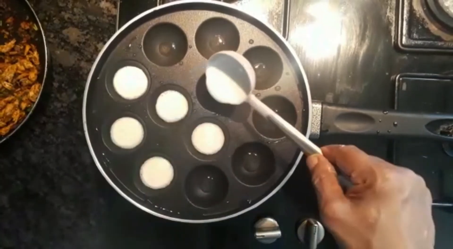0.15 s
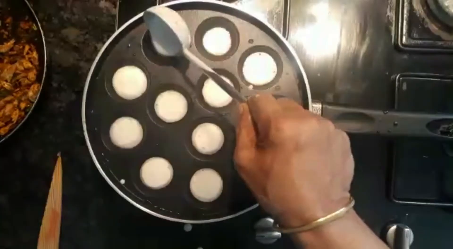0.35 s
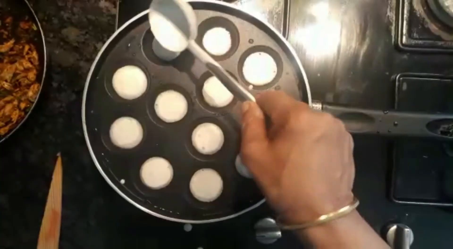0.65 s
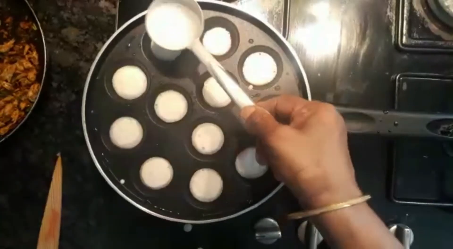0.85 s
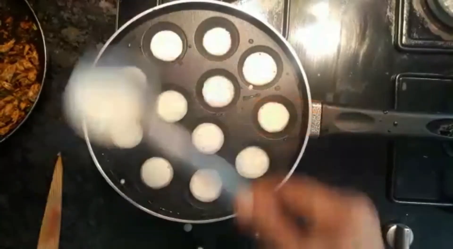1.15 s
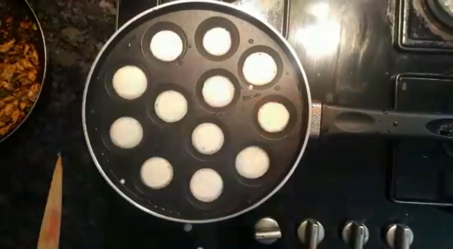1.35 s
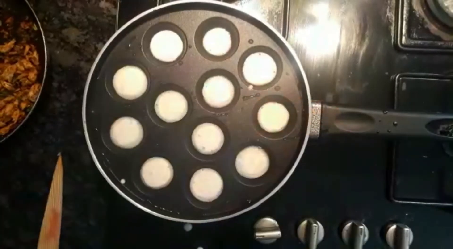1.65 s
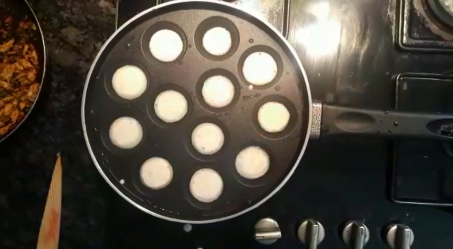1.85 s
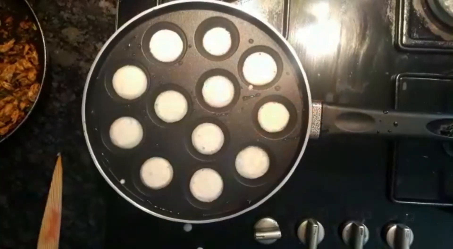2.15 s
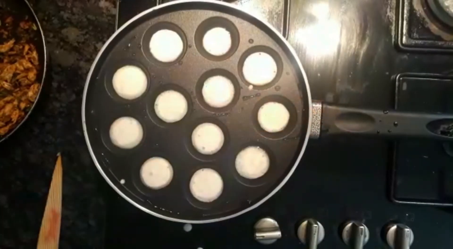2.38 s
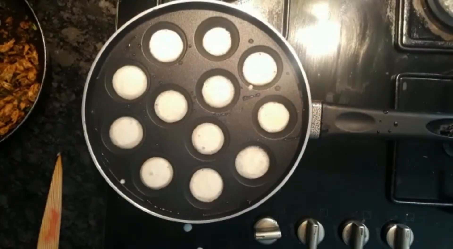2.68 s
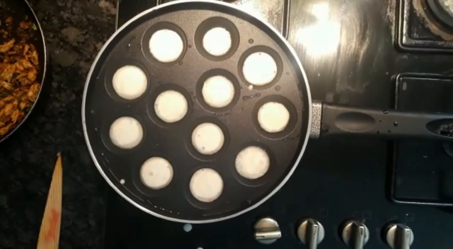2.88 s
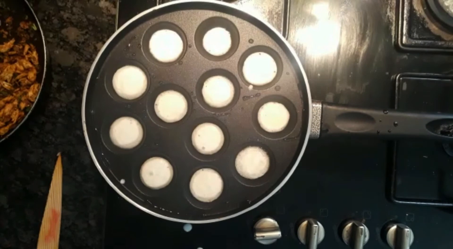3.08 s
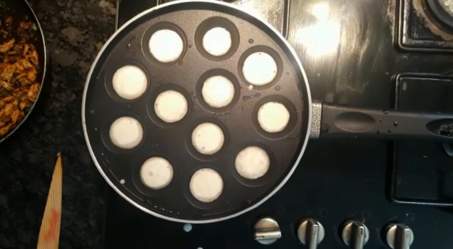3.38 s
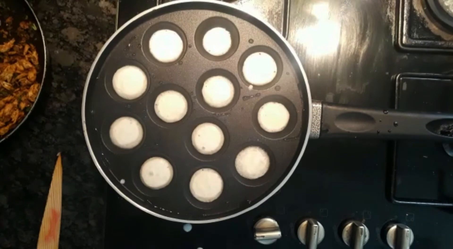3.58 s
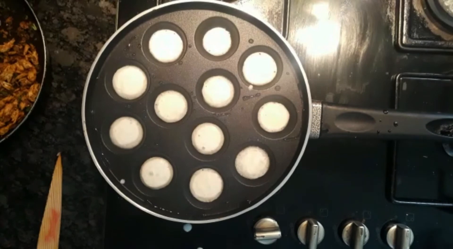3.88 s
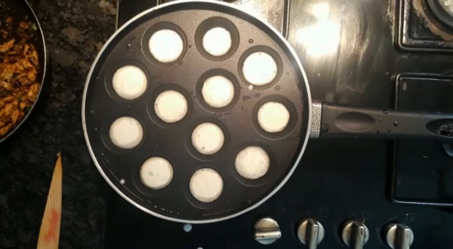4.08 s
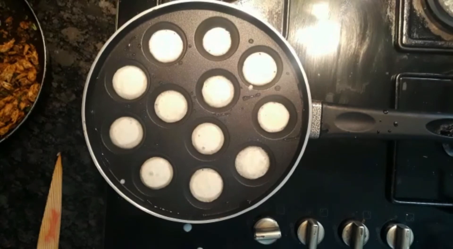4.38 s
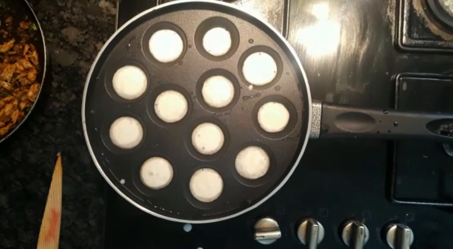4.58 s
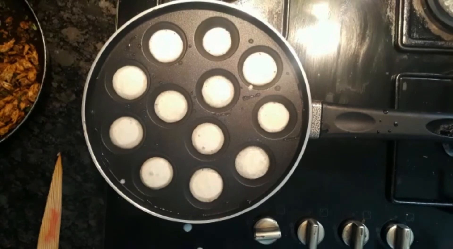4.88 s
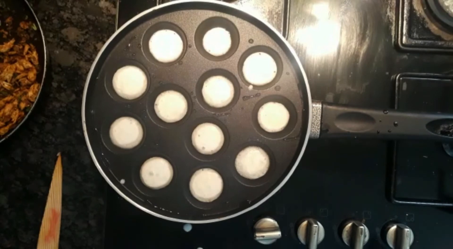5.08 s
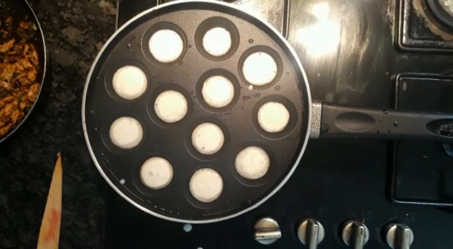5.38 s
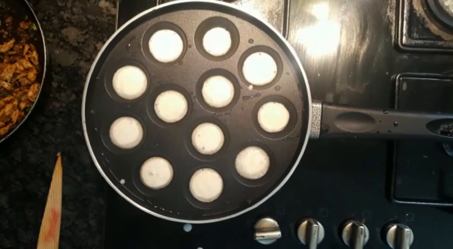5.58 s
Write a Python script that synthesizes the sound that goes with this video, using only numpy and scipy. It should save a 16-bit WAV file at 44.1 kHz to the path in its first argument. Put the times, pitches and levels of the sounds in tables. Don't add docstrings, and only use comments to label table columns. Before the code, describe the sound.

Dense crackling fry with sharp wet pops and spitting oil, broken by a metallic clink, a hard cupboard knock and a softer second one.

```python
import sys
import numpy as np
from scipy import signal
from scipy.fft import rfft, irfft
from scipy.io import wavfile
from scipy.ndimage import uniform_filter1d

SR = 44100
rng = np.random.default_rng(int(sys.argv[2]) if len(sys.argv) > 2 else 0)


def amp(db):
    return 10 ** (np.asarray(db, float) / 20)


def write(x):
    x = np.atleast_2d(x).T
    wavfile.write(sys.argv[1], SR, np.round(np.clip(x, -1, 1) * 32767).astype(np.int16))


N = 253134

# freq_hz [Hz], level_db [dB]
HOLLOW_SPECTRUM = [(1900, -30), (2300, -5), (2800, 2), (3250, 1.5), (3700, -7), (4200, -11.5),
                   (4800, -22.5)]
# freq_hz [Hz], level_db [dB]
DEEP_SPECTRUM = [(400, -10), (700, -7), (900, 6), (1200, 3), (1600, 3.5), (2000, 7.5), (2500, -26)]
# freq_hz [Hz], level_db [dB]
SPRAY_SPECTRUM = [(3800, -15), (4600, -3), (5200, 0), (7000, -0.5), (9000, 0.5), (11000, 2), (13000, -1),
                  (15600, -3)]
# freq_hz [Hz], level_db [dB]
WOOD_SPECTRUM = [(41, -83), (70, -27), (137, -3), (177, -5.5), (395, -8.5), (423, -16), (596, -1),
                 (784, -5.5), (1070, -3.5), (1670, -6), (2390, -19), (3360, -19), (4200, -30), (5460, -90),
                 (9240, -120)]
# freq_hz [Hz], level_db [dB]
HUM_SPECTRUM = [(15, -28), (25, -7), (35, -4), (49, -43), (77, -5.5), (119, 3), (143, -2), (195, -7),
                (244, -7), (437, -12.5), (706, -6.5), (810, -10.5), (897, -6), (1180, -20.5), (1500, -7.5),
                (1950, -40), (3300, -120)]


def on_log(hz, table):
    f, v = np.transpose(table)
    return np.interp(np.log(np.maximum(hz, 1)), np.log(f), v)


def along(table):
    s, *columns = np.transpose(table)
    return [np.interp(np.arange(N) / SR, s, c) for c in columns]


def through(x, response):
    return signal.fftconvolve(x, response)[:N]


def colour(table, size=4096):
    log_gain = on_log(np.arange(size // 2 + 1) * SR / size, table) * np.log(10) / 20
    cepstrum = irfft(log_gain)
    cepstrum[1:size // 2] *= 2
    cepstrum[size // 2 + 1:] = 0
    response = irfft(np.exp(rfft(cepstrum)))
    return response / np.sqrt(np.sum(response ** 2))


def strikes(s, size):
    return np.bincount(np.clip(np.asarray(s) * SR, 0, N - 1).astype(int), size, N)


def burst(push, fade_ms, rise_ms):
    t_ms = np.arange(SR // 20) * 1000 / SR
    power = np.exp(-2 * t_ms / fade_ms) * (1 - np.exp(-t_ms / rise_ms)) ** 2
    return np.sqrt(np.abs(through(push ** 2, power))) * rng.standard_normal(N)


def walk(rate_hz):
    k = int(SR / rate_hz)
    held = np.repeat(rng.standard_normal(N // k + 1), k)
    return 1.45 * uniform_filter1d(uniform_filter1d(held, k), k)[:N]


def lone_bursts(count=200):
    # start_s [s], ring_db [dB], deep_db [dB re ring], spray_db [dB re ring]
    pops = [(0.0408, -26.5, -16, 2), (0.2623, -23.5, -11.5, 1), (0.4099, -31, -6, 8.5), (0.442, -34, -5, 5),
            (0.464, -31, -6.5, 5), (0.619, -28, -6, -8), (0.989, -27, -17, 2.5), (1.059, -28, -2, 3),
            (1.3796, -30, -13, -4), (1.4458, -30, -16, 2), (1.728, -27, -7.5, -16),
            (1.8799, -21.5, -12, -3), (2.258, -31, -2.5, -21), (2.5797, -27.5, -6, -16),
            (2.7356, -30, -8, -10), (2.9608, -25, -11.5, 4), (3.4356, -29.5, -12, 1.5),
            (3.775, -30.5, -12, 5), (3.8375, -33.5, -5.5, -1), (4.139, -31, 1, 1), (4.174, -29, -2, -3.5),
            (4.3204, -32.5, -4, -19), (4.4622, -31.5, -10, -4), (4.521, -29, -13.5, -2),
            (4.6705, -26.5, -11, -1.5), (4.8679, -27.5, -37, 2.5), (4.9376, -25.5, -13.5, -5),
            (5.0796, -28, -14, -3.5), (5.1474, -23, -6, -3), (5.5969, -30.5, -20, 0)]
    # start_s [s], ring_db [dB]
    plops = [(0.0575, -35), (0.0831, -34.5), (0.2122, -31), (0.399, -33), (0.5827, -35), (0.6085, -32),
             (0.6115, -36), (0.6505, -32.5), (0.7943, -34), (0.9139, -34), (1.1328, -36), (1.5319, -37),
             (1.7163, -34), (1.7427, -30.5), (1.9485, -30), (2.1337, -30), (2.1439, -40), (2.2683, -32),
             (2.3193, -30), (2.4308, -35), (2.6899, -34.5), (2.831, -29), (2.848, -33), (3.4236, -31.5),
             (4.5403, -34), (4.6905, -31.5), (4.8804, -30.5), (4.9069, -35), (4.9993, -33.5), (5.0547, -34)]
    # start_s [s], ring_db [dB]
    cracks = [(0.2258, -34), (0.2782, -33), (0.291, -32), (0.3207, -33), (0.3784, -35.5), (0.5631, -33),
              (0.7384, -34.5), (0.8625, -33), (0.9689, -32.5), (1.006, -33), (1.1171, -32.5),
              (1.3405, -31.5), (1.8168, -36), (1.8903, -33), (1.9374, -35), (2.2467, -33), (2.647, -40),
              (2.7622, -37), (2.818, -36), (2.99, -37.5), (3.0849, -34.5), (3.6221, -38), (4.62, -34),
              (4.7251, -36), (4.9896, -35), (5.222, -38), (5.4502, -35.5), (5.5421, -36), (5.628, -36),
              (5.678, -33.5),
              (0.093, -39), (0.186, -36), (0.3582, -34.5), (0.3695, -40), (0.5297, -37.5),
                    (0.5484, -40), (0.702, -40), (0.8361, -53), (0.8935, -35), (1.097, -34), (1.196, -38),
                    (1.2945, -38), (1.7963, -39), (2.0563, -37), (2.0892, -42), (2.1064, -44),
                    (2.4603, -51), (2.4828, -45), (2.5174, -34.5), (2.6571, -34.5), (3.109, -40),
                    (3.174, -36.5), (3.2006, -40), (3.2876, -35.5), (3.7401, -42), (3.8042, -37),
                    (3.9572, -39), (5.4206, -47), (5.4744, -35.5), (5.502, -40)]
    # start_s [s], spray_db [dB]
    spits = [(0.0123, -32.5), (0.13, -30.5), (0.3078, -31), (0.4485, -24), (0.4917, -31), (0.7312, -27),
             (0.9584, -37), (1.2217, -32), (1.374, -29), (1.75, -28.5), (1.8325, -37), (2.527, -35),
             (2.5576, -30.5), (2.742, -33), (2.8916, -26), (2.9203, -27), (3.1427, -31.5), (3.223, -32),
             (3.228, -29.5), (3.699, -29), (3.7138, -28), (3.817, -34), (4.058, -34), (4.416, -31),
             (4.8748, -32), (5.1327, -29.5), (5.2699, -28), (5.4417, -33.5), (5.6002, -27.5), (5.661, -33)]
    ring_re_spray_db, deep_re_spray_db = -7, -15.5
    rows = pops + [(s, db, -10.5, -6) for s, db in plops]
    rows = rows + [(s, db, -8.5, 3.7) for s, db in cracks]
    rows = rows + [(s, db + ring_re_spray_db, deep_re_spray_db - ring_re_spray_db, -ring_re_spray_db)
                   for s, db in spits]
    when = rng.random(count) * N / SR
    scatter_db = 3.5 * rng.standard_normal((count, 3))
    ticks = np.column_stack([when, scatter_db + [-42, -12, -.6]])
    s, ring_db, deep_db, spray_db = np.vstack([rows, ticks]).T
    ring = strikes(s, -amp(ring_db - 0.7))
    deep = strikes(s, -amp(ring_db + deep_db + 2.5))
    spray = strikes(s, amp(ring_db + spray_db - 2.5))
    return ring, deep, spray


def bubbles(ring, deep, spray):
    full = rng.random(N) < .5
    hollow = 0
    for share, pitch in ((full, 1.06), (~full, .92)):
        push = 4.5 * ring * share + .4 * burst(ring * share, 1.8, .2)
        hollow = hollow + through(push, colour(np.array(HOLLOW_SPECTRUM) * [pitch, 1]))
    low = through(3.23 * deep + .5 * burst(deep, 2.5, 0.18), colour(DEEP_SPECTRUM))
    spray = np.roll(spray, 16)
    droplets = 2 * np.roll(spray, 30) + burst(spray, 1.8, .25) + .2 * burst(spray, 8, .25)
    return hollow + low + through(droplets, colour(SPRAY_SPECTRUM))


def sizzle(count=3800):
    # time_s [s], level_db [dB]
    boiling = [(0.0, -52.5), (0.27, -51), (0.43, -47.5), (0.7, -47.5), (1.65, -47), (1.77, -46.5),
               (2.38, -46.5), (2.84, -48), (2.97, -50.5), (3.56, -49.5), (3.69, -53.5), (3.88, -47),
               (4.28, -49), (5.1, -49.5), (5.28, -50), (5.74, -50.5)]
    lone = bubbles(*lone_bursts())
    t = np.arange(N) / SR
    spray_db = along(boiling)[0]
    ring_db = spray_db + 2.5 - 0.3 * t
    deep_db = spray_db - 5.5 + 0.37 * t
    cluster = amp(0.4 * walk(14) + 2.1 * walk(70))
    u = rng.random((count, 5)).T
    size = amp(np.minimum(-3.0 * np.log(u[1]), 7.0))
    small = [strikes(u[0] * N / SR, size * amp(6.4 * (u[k] - 1.0))) * cluster for k in (2, 3, 4)]
    bed = bubbles(small[0] * amp(ring_db - 3.5), small[1] * amp(deep_db - 19.0),
                  small[2] * amp(spray_db - 2.5))
    fry = lone + bed
    for spectrum, hiss_db in ((HOLLOW_SPECTRUM, ring_db - 12), (DEEP_SPECTRUM, deep_db - 5.5),
                              (SPRAY_SPECTRUM, spray_db - 5.5)):
        fry = fry + through(rng.standard_normal(N), colour(spectrum)) * cluster * amp(hiss_db)
    lag = SR / 1744
    return fry + 0.2 * np.interp(np.arange(N) - lag, np.arange(N), fry, left=0)


def knocks():
    # start_s [s], level_db [dB], panel_hz [Hz], room_send_db [dB]
    blows = [
        (3.972, -35.5, 1240, -2.5),
        (3.9944, -5.5, 1190, -16.5),
        (4.382, -15.5, 1110, -16),
        (5.709, -42.5, 141, 3),
        (5.7267, -36, 1280, -7),
    ]
    near, far, t = 0, 0, np.arange(SR // 20) / SR
    box = amp(-14) * np.sin(2 * np.pi * 662 * t) * t / .006 * np.exp(1 - t / .006)
    for s, db, panel_hz, send_db in blows:
        turns = t * panel_hz
        swing = -np.sin(2 * np.pi * turns) * np.exp(-((turns - 2.1) / 1.1) ** 2)
        push = strikes([s], [amp(db)])
        body = through(push, colour(WOOD_SPECTRUM))
        near = near + through(push, swing + box) + amp(4) * np.roll(body, 60)
        far = far + body * amp(send_db + 32.5)
    return near, far


def clinks():
    # start_s [s], level_db [dB], bowl_hz [Hz], bowl_db [dB re the rest], room_send_db [dB]
    blows = [
        (1.5631, -14, 1758, -2.5, -18.5),
        (2.2573, -31, 2520, 2.5, -15.5),
        (2.4325, -39, 1540, 6.5, -21),
        (3.9942, -28, 3315, 9.5, -14),
        (4.3882, -29.5, 8200, -2, -17),
    ]
    # freq_hz [Hz], level_db [dB]
    steel_modes = [(1950, -4), (3800, -1.5), (4377, -4), (5030, 3.5), (5350, -22), (6480, -0.5), (6940, -5),
                   (8190, -2), (8480, -1), (10900, -5)]
    near, far, t = 0, 0, np.arange(SR // 8) / SR
    hz, mode_db = np.transpose(steel_modes)[:, :, None]
    steel_fade, bowl_fade = 1000 ** (-t / .028), 1000 ** (-t / .05)
    contact = 1 - np.exp(-(t / .0004) ** 2)
    crack_colour = colour(SPRAY_SPECTRUM) + amp(4) * colour(HOLLOW_SPECTRUM)
    for s, db, bowl_hz, bowl_db, send_db in blows:
        steel = amp(mode_db + rng.standard_normal(hz.shape)) * np.sin(2 * np.pi * hz * t)
        steel = steel.sum(axis=0) * steel_fade
        cluster = sum(np.sin(2 * np.pi * bowl_hz * split * t) for split in (.97, 1, 1.03))
        bowl = amp(bowl_db) * cluster / 2 * bowl_fade
        push = strikes([s], [amp(db)])
        crack = amp(-12.5) * through(burst(push, 2.9, 0.86), crack_colour)
        thud = through(push, colour(WOOD_SPECTRUM))
        near = near + thud + crack + through(push, amp(-8.5) * (steel + bowl) * contact)
        heard = amp(-6) * contact * (steel * np.exp(-t / .005) + bowl)
        far = far + amp(send_db + 16) * (crack + through(push, heard))
    return near, far


def cutlery():
    # freq_hz [Hz], width_hz [Hz], level_db [dB]
    spoon_modes = [(6770, 110, -5), (8160, 89, -3), (9350, 97, -4), (10770, 87, -6), (11100, 76, -9),
                   (11500, 120, -10), (12000, 89, -7), (13600, 91, -6), (14500, 85, 4), (15300, 67, -6)]
    t = np.arange(SR // 8) / SR
    hz, _, mode_db = np.transpose(spoon_modes)[:, :, None]
    modes = amp(mode_db - mode_db.max()) * np.sin(2 * np.pi * (hz * t + rng.random(hz.shape)))
    ring = np.sum(modes, axis=0) * 1000 ** (-t / 0.099) * np.minimum(t / .0015, 1)
    push = strikes([5.7255], [amp(-30)])
    rattle = amp(-4) * through(burst(push, 17.0, 0.54), colour(SPRAY_SPECTRUM))
    return through(push, ring) + rattle


def bump():
    t = np.arange(SR // 10) / SR
    push = np.sin(np.pi * np.minimum(t / .0008, 1))
    wobble = -.4 * np.sin(2 * np.pi * 126 * t) * np.exp(-t / .012)
    return through(strikes([.1171], [amp(-31.5)]), push + wobble)


def burner():
    rumble = through(rng.standard_normal(N), colour(HUM_SPECTRUM, size=16384))
    return rumble * amp(-57 + 0.31 * walk(4.53))


def kitchen(gap_ms=3.0):
    # freq_hz [Hz], t60_s [s]
    room_t60 = [(100, 0.56), (300, 1.0), (1000, 1), (2500, 0.68), (6000, 0.33), (14000, 0.75)]
    t, out = np.arange(int(1.2 * SR)) / SR, 0
    for hz in 60 * 2 ** np.arange(9.):
        edges_hz = [hz / np.sqrt(2), min(hz * np.sqrt(2), SR / 2.1)]
        band = signal.butter(2, edges_hz, "bandpass", fs=SR, output="sos")
        noise = signal.sosfilt(band, rng.standard_normal(len(t)))
        out = out + noise * 1000 ** (-t / on_log(hz, room_t60))
    out = out * (1 - np.exp(-t * 1000 / gap_ms))
    return out / np.sqrt(np.sum(out ** 2))


def scene():
    fry = sizzle()
    wood, wood_far = knocks()
    steel, steel_far = clinks()
    room = through(amp(-8.0) * fry + wood_far + steel_far, kitchen())
    mono = fry + wood + steel + room + burner() + bump() + cutlery()
    return np.array([mono, mono])


def roll_off(x):
    return signal.sosfilt(signal.butter(12, 17020, fs=SR, output="sos"), x)


def record(dry):
    dry = signal.sosfilt(signal.butter(1, 60, "highpass", fs=SR, output="sos"), dry)
    patches = np.repeat(rng.random(N // 1024 + 1) < .2, 1024)[:N]
    apart = uniform_filter1d(patches * 1., 300)
    hiss_colour = colour(SPRAY_SPECTRUM) + .15 * colour(HOLLOW_SPECTRUM) + .55 * colour(WOOD_SPECTRUM)
    treble = through(rng.standard_normal(N), hiss_colour) * apart * amp(-52.5)
    bass = through(rng.standard_normal(N), colour(HUM_SPECTRUM)) * amp(-80)
    quiet = uniform_filter1d(dry[0] ** 2, 1024) < amp(-66)
    side = (treble + bass) * uniform_filter1d(quiet * 1., 200)
    dry = dry + side * np.array([[1], [-1]])
    mix = signal.sosfilt(signal.ellip(10, .3, 50, 15800, fs=SR, output="sos"), dry)
    return roll_off(mix)


dry = scene()
out = record(dry)
write(out)
```